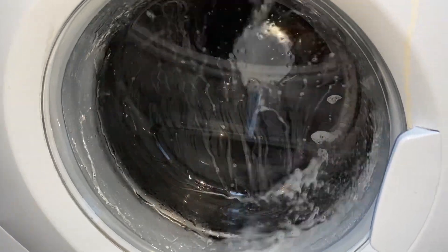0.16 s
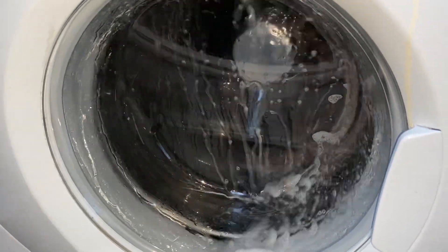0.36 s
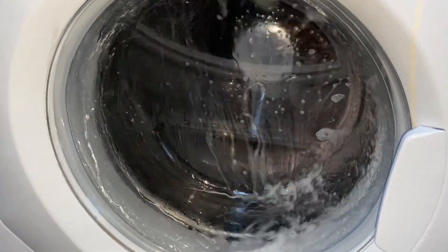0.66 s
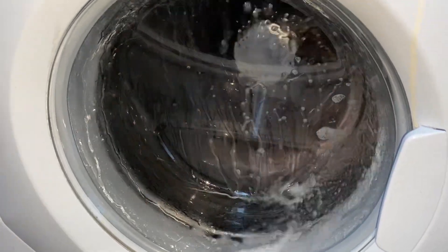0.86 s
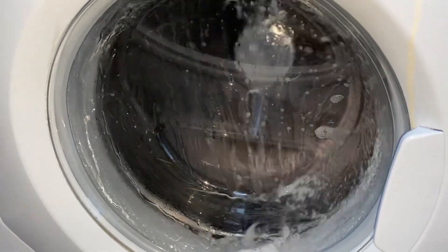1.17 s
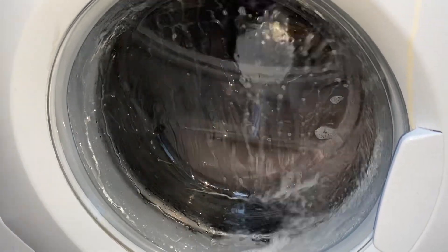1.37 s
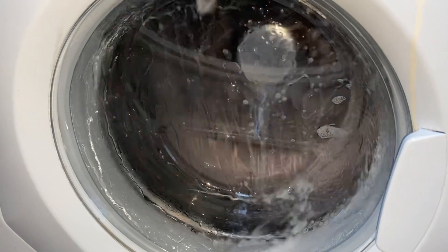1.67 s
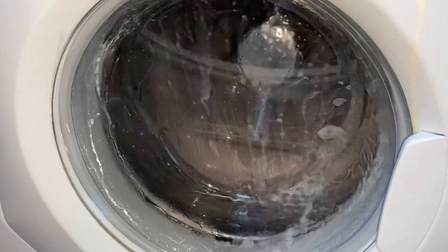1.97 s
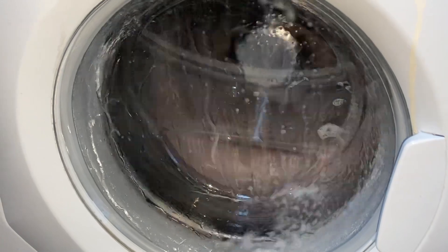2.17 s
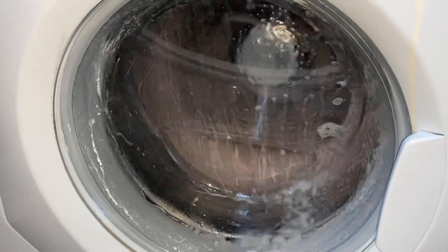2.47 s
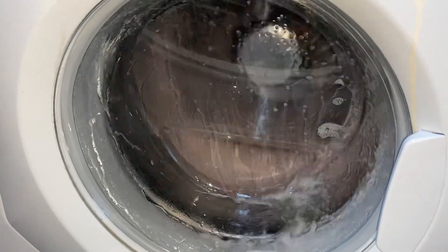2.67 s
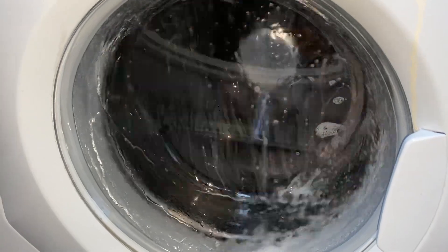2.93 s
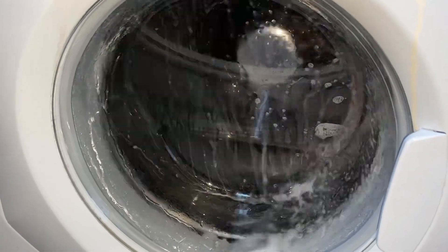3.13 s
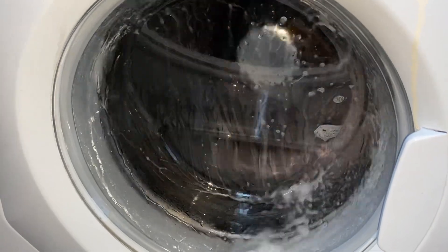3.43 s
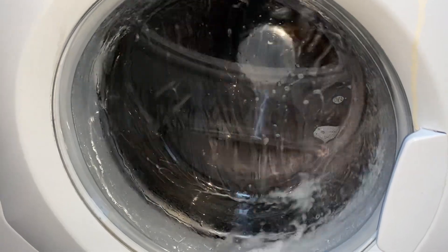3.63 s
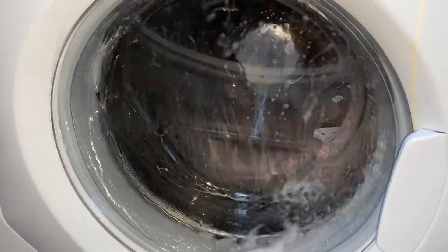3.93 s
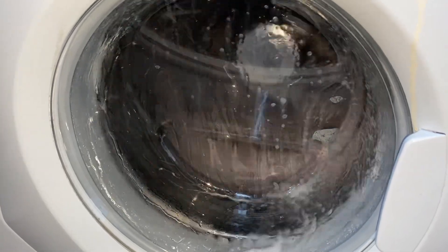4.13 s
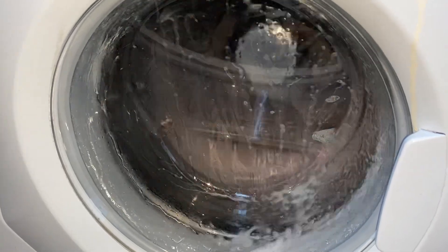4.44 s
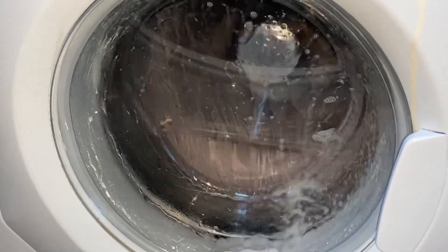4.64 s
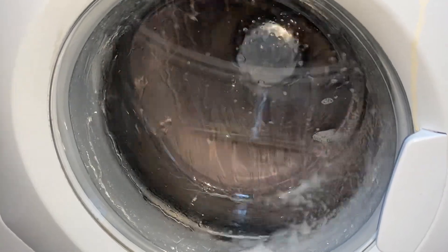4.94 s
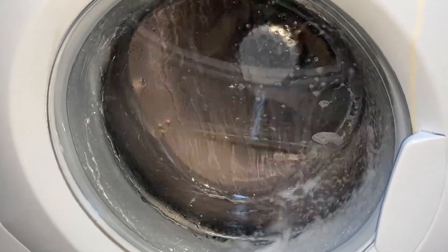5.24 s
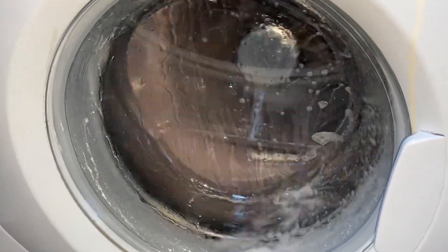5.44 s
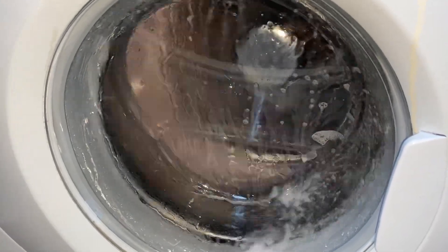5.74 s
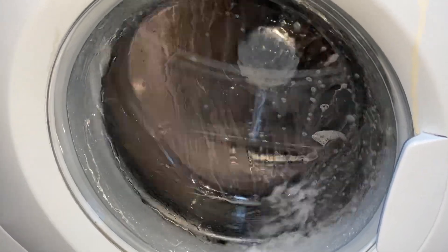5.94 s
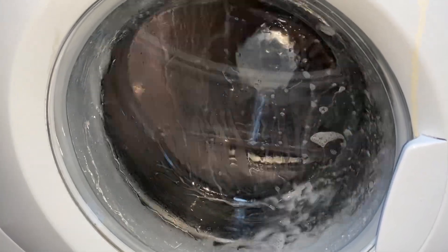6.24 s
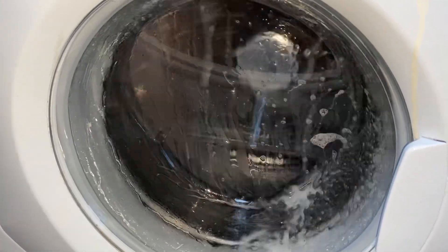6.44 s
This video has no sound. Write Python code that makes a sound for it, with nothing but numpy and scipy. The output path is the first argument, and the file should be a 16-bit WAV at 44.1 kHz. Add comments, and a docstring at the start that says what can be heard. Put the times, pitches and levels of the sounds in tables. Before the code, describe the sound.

Close beside a front-loading washer indoors, a heavy load is already spinning fast. A loud low hum throbs in very rapid jolts, about twenty to forty a second, shaking the cabinet. Loose parts knock in a dense repeating rattle, ringing thin panels. Over it sit a faint metallic motor whine and rough air and spray hiss. It continues without a stop, speed swaying only slightly.

```python
"""A heavy low throb comes first: an unbalanced load spins at about 600 turns a minute and shakes the
cabinet of a front-loading washer at whole orders of the drum turn, close to a two-port microphone.
Loose parts knock at nearly the same angles each turn and ring the panels; the belt-driven motor whines
at multiples of its pole rate. Behind lie shaped noise for air and spray, a noise pattern that nearly
repeats each turn for the uneven rim, and short tuned grains for spray on the door glass."""
import sys
import numpy as np
from scipy import signal
from scipy.fft import rfft, irfft
from scipy.io import wavfile
from scipy.ndimage import uniform_filter1d

SR = 44100
rng = np.random.default_rng(int(sys.argv[2]) if len(sys.argv) > 2 else 0)


def unload_audio(sound):
    """Save the sound as a 16-bit wav file, at the path given as the first command line argument."""
    columns = np.transpose(np.atleast_2d(sound))
    # keep every value between -1 and 1, then stretch to whole-number steps
    steps = np.round(np.clip(columns, -1, 1) * 32767)
    wavfile.write(sys.argv[1], SR, steps.astype(np.int16))


N = 291060

# air and spray noise before throb and port tilt: f/Hz, level/dB per Hz
HISS_SPECTRUM = [(20, -75), (60, -51), (150, -61), (300, -59.5), (800, -60), (1300, -67), (1900, -67.5),
                 (3000, -69.5), (4400, -73), (6000, -82), (7600, -81.5), (9200, -81), (10500, -80),
                 (12000, -88), (13200, -79), (14600, -79.5), (15700, -72)]
# repeating rim noise before port tilt: f/Hz, nominal level/dB per Hz
DRONE_SPECTRUM = [(30, -99), (60, -53), (90, -58), (150, -59.5), (240, -52), (380, -56), (640, -61),
                  (700, -54), (790, -53.5), (860, -64), (1500, -67), (2200, -80.5)]
# motor multiples that stand out, before waver and throb: {multiple of the pole rate: level/dB rms}
WHINE_LEVELS = {17: -51, 22: -57, 25: -58, 33: -56, 36: -42, 37: -54, 41: -53, 43: -52, 53: -54, 58: -50,
                62: -54, 66: -48}
# knocks of loose parts: drum angle/turns, relative level/dB, brightness/0-1
LOOSE_PARTS = [(.0, -24, .5), (.16, -27, .4), (.29, -27, .5), (.44, -26, .4), (.45, -25, 1), (.5, -25, .7),
               (.58, -24, .2), (.64, -24, .3), (.7, -26, .7), (.79, -24, .6), (.9, -27, .6), (.95, -25, .3)]
# panel modes rung by the knocks: f/Hz, relative level/dB, t60/s
PANEL_MODES = [(387.4, -5, 0.1), (497, -10.5, 0.096), (554.5, -9.5, 0.1), (696.2, -7.5, 0.11),
               (772, -2.5, 0.071), (957, -3, 0.061), (1077, -15.5, 0.2), (1169, -3.5, 0.062),
               (1274, -11.5, 0.05), (1399.5, -1, 0.043), (1560, -4.5, 0.028)]
# cabinet shake: order of the turn, level/dB rms at REF_RPM, gain/dB per rpm above it, left-right/dB
SHAKE_ORDERS = [(2, -42, 0, 1), (4, -27.5, .1, 2.7), (6, -30.4, .8, 1.2), (8, -19.4, .3, 2.2),
                (9, -37, 0, 2.2), (10, -23.7, -.1, 1.6), (12, -14.8, -.3, 2.3), (14, -28.8, .9, 2),
                (16, -29.4, -.4, 3.6), (18, -37, 1.5, 9), (20, -31, .9, 7.5), (22, -40.5, 2, 0),
                (26, -37, .2, -1.4), (36, -38, 2.5, -2.7)]
# microphone ports: f/Hz, left-right likeness/0-1, left-right level/dB, left port's lead/rad
MIC_PORTS = [(60, .99, 2, 0), (170, .9, 2, 0), (500, .35, 1.1, 0), (950, .45, 1.4, 1.3), (1600, .1, .6, .5),
             (2900, .6, 1.4, .3), (4300, .55, .8, .7), (5700, .25, 2.5, .1), (6700, .99, 0, 0)]

# the drum speed swings past its set point and settles
SET_RPM, SWING_RPM, SETTLE_S, SWING_S, SWING_START_RAD = 591.901, -8.735, 4.134, 10.1155, 1.2663
START_TURN, REF_RPM = -.034, 594  # drum angle at the start; speed at which the levels are set
DROPS_DB, DROPS_PER_S = -46.5, 400  # rms before port tilt; average rate
MOTOR_RATIO = 23.97  # motor pole passes per drum turn
# faint multiples of the pole rate, 8th to 66th: mean level, random spread, lift below the 17th
FAINT_DB, FAINT_SPREAD_DB, FAINT_LOW_DB = -65, 3, 5.5
# the 18th multiple: level before its swell, rise, then middle and length of that rise
SLOT_DB, SLOT_SWELL_DB, SLOT_SWELL_S, SLOT_RISE_S = -50, 6, 4.3, .7
KNOCK_DB, KNOCK_DB_PER_RPM = -.85, .5  # trim at REF_RPM; faster spin, harder knocks
# order 25 meets a cabinet resonance: peak rms before build-up, half width, speed, build-up time
HUM_DB, HUM_WIDTH_RPM, HUM_RPM, HUM_BUILD_S = -29, 1.6, 592., .3
# the right side's treble phase steps ahead in four half-cycle steps: first middle, spacing, width, likeness
# lost mid step
STEP_HZ, STEP_SPACING_HZ, STEP_WIDTH_HZ, STEP_LOSS = 8100, 2050, 1300, .22
EDGE_HZ = 15750  # band limit

T = np.arange(N) / SR
SWING = np.exp(-T / SETTLE_S) * np.cos(2 * np.pi * T / SWING_S + SWING_START_RAD)
RPM = SET_RPM + SWING_RPM * SWING
TURN = START_TURN + np.cumsum(RPM) / 60 / SR  # drum angle in turns


def gain_of(db):
    """Decibels to amplitude."""
    return 10 ** (np.asarray(db) / 20)


def read(points, hz, column=1):
    """Reads a table on a log-frequency axis."""
    rows = np.transpose(points)
    return np.interp(np.log(hz + 1), np.log(rows[0] + 1), rows[column])


def drifting(shape, memory_steps):
    """Unit noise that changes slowly along the first axis."""
    keep = np.exp(-1 / memory_steps)
    fresh = rng.standard_normal((shape[0] + 60,) + shape[1:])  # 60 steps of run-in
    drift = signal.lfilter([np.sqrt(1 - keep * keep)], [1, -keep], fresh, axis=0)
    return drift[-shape[0]:]


def ports(a, b, spectrum=((1, 0), (2, 0))):
    """Colours two signals and mixes them into a partly alike left and right; the default is flat."""
    hz = np.fft.rfftfreq(N, 1 / SR)
    half_cycles = sum(np.clip((hz - STEP_HZ - k * STEP_SPACING_HZ) / STEP_WIDTH_HZ + .5, 0, 1) for k in range(4))
    same = read(MIC_PORTS, hz) - STEP_LOSS * np.sin(np.pi * half_cycles) ** 2
    tilt = gain_of(read(MIC_PORTS, hz, column=2) / 2)
    right_lag = read(MIC_PORTS, hz, column=3) - np.pi * half_cycles
    a, b = rfft(a), rfft(b)
    right = (same * a + np.sqrt(1 - same ** 2) * b) * np.exp(-1j * right_lag)
    return irfft(np.array([a * tilt, right / tilt]) * gain_of(read(spectrum, hz)), N)


def hiss(throb_db=1.13, throb_turn=.51, flicker_db=.5, db_per_rpm=.13):
    """Air and spray: noise throbbing twice a turn, flickering, and weaker while the drum is still slow."""
    flicker = uniform_filter1d(rng.standard_normal(N), 600) * np.sqrt(600)
    throb = np.cos(4 * np.pi * (TURN - throb_turn))
    slow_rpm = np.minimum(RPM - REF_RPM, 0)
    level = gain_of(throb_db * throb + flicker_db * flicker + db_per_rpm * slow_rpm)
    return ports(*rng.standard_normal((2, N)) * level, HISS_SPECTRUM) * np.sqrt(SR / 2)


def drone(memory_turns=7.4):
    """The drum's uneven rim passes again each turn: noise that repeats and changes only slowly."""
    steps = 4096  # noise points around the rim
    rim = drifting((int(TURN[-1]) + 2, 2, steps), memory_turns)
    place = (TURN + 1) * steps
    points = np.arange(rim[:, 0].size) + steps / 2
    a, b = (np.interp(place, points, rim[:, k].ravel()) for k in (0, 1))
    return ports(a, b, DRONE_SPECTRUM) * np.sqrt(SR / 2)


def drops(low_hz=2200, high_hz=3700, cycles=24., spread_db=5.):
    """Spray flung against the door glass: short tuned grains, a few of them large."""
    hits = rng.random(N) < DROPS_PER_S / SR
    size = gain_of(spread_db * np.minimum(rng.exponential(1, N), 4)) * hits
    pitch = rng.integers(0, 16, N)
    out = np.zeros((2, N))
    for k, hz in enumerate(np.geomspace(low_hz, high_hz, 16)):
        phase = np.arange(int(cycles * SR / hz)) * hz / SR  # in cycles
        grain = np.sin(np.pi * phase / cycles) ** 2 * np.sin(2 * np.pi * phase)
        out[k % 2] += signal.oaconvolve(size * (pitch == k), grain)[:N]
    return ports(*(gain_of(DROPS_DB) * out / out.std()))


def whine(ripple_rad=.028, wobble_rad=.012, waver_db=2., ripples_per_turn=2.1):
    """Multiples of the pole rate; the load ripples the motor speed, which spreads the high ones."""
    multiples = np.arange(8, 67)
    slow = np.arange(0, N + 512, 512)  # control points in samples
    wander = drifting((len(slow), 60), 1.0)  # 59 levels and one motor angle
    faint_db = FAINT_DB + FAINT_LOW_DB * (multiples < 17) + FAINT_SPREAD_DB * rng.standard_normal(59)
    swell = np.clip((slow / SR - SLOT_SWELL_S) / SLOT_RISE_S + .5, 0, 1)
    slot_db = SLOT_DB + SLOT_SWELL_DB * swell
    ripple_angle = 2 * np.pi * ripples_per_turn * TURN
    angle = 2 * np.pi * MOTOR_RATIO * TURN + ripple_rad * np.sin(ripple_angle)
    angle += wobble_rad * np.interp(np.arange(N), slow, wander[:, -1])
    out = np.zeros(N)
    for k, multiple in enumerate(range(8, 67)):
        db = slot_db if multiple == 18 else WHINE_LEVELS.get(multiple, faint_db[k])
        size = np.interp(np.arange(N), slow, gain_of(db + waver_db * wander[:, k]))
        out += size * np.sqrt(2) * np.cos(multiple * angle + 2 * np.pi * rng.random())
    out *= 1 + .15 * np.cos(ripple_angle)  # the same ripple throbs the level
    return ports(out, np.roll(out, -9))  # a copy nine samples ahead serves as the second signal


def knocks(wander_db=1.4, jitter_turns=.004, tilt_db=9., soft_s=.003):
    """Each part knocks once a turn; its strength and angle drift, and bright knocks favour the high modes."""
    turns = np.arange(int(TURN[-1]) + 1)[:, None]
    t = np.arange(8192) / SR
    angle, db, bright = np.transpose(LOOSE_PARTS)
    chance = drifting((len(turns), len(LOOSE_PARTS), 2), 2.75)  # memory in turns
    at = np.searchsorted(TURN, turns + angle + jitter_turns * chance[..., 0]).clip(0, N - 1)
    strength_db = db + wander_db * chance[..., 1]
    out = np.zeros((2, N))
    for hz, mode_db, t60 in PANEL_MODES:
        size = gain_of(strength_db + mode_db + tilt_db * (bright - .5) * np.log2(hz / 800))
        soft_start = 1 - np.exp(-t / soft_s)  # padded blow
        ring = gain_of(-60 * t / t60) * np.sin(2 * np.pi * hz * t) * soft_start
        for side in out:  # each part couples to each mode with its own sign
            signs = rng.choice([-1., 1.], len(LOOSE_PARTS))
            blows = np.bincount(at.ravel(), (size * signs).ravel(), N)
            side += signal.oaconvolve(blows, ring)[:N]
    level = gain_of(KNOCK_DB + KNOCK_DB_PER_RPM * (RPM - REF_RPM))
    return ports(*out * level, ((120, -40), (300, 0)))  # small panels radiate little bass


def resonant_hum():
    """Order 25 swells as it meets a cabinet resonance, which takes time to build up and die."""
    lag = np.exp(-1 / (HUM_BUILD_S * SR))
    response = 1 / np.sqrt(1 + ((RPM - HUM_RPM) / HUM_WIDTH_RPM) ** 4)
    level = signal.lfilter([1 - lag], [1, -lag], response)
    tone = np.cos(2 * np.pi * (25 * TURN + rng.random()))
    return np.ones((2, 1)) * gain_of(HUM_DB) * np.sqrt(2) * level * tone


def shake(firm_lead=3.7, late_lead=6.5, ahead_rad=.6, ahead_hz=145, ahead_width_hz=35,
          slide_rad_per_rpm=.3, slide_hz=130, slide_width_hz=18):
    """Four jolts a turn, every second one a little late: in-between orders fall a quarter cycle behind."""
    extra_rpm = np.maximum(RPM - REF_RPM, -3.5)
    out = resonant_hum()
    for order, db, db_per_rpm, pan_db in SHAKE_ORDERS:
        # low orders lead, as behind a bass cut
        phase = (late_lead / order) ** 2 - np.pi / 2 if order % 4 else (firm_lead / order) ** 2
        hz = order * REF_RPM / 60
        # orders near ahead_hz lead
        phase = phase + ahead_rad * np.exp(-((hz - ahead_hz) / ahead_width_hz) ** 2)
        # orders near slide_hz move ahead as the drum speeds up
        slide = slide_rad_per_rpm * np.exp(-((hz - slide_hz) / slide_width_hz) ** 2)
        phase = phase + slide * extra_rpm
        level = gain_of(db + db_per_rpm * extra_rpm) * np.sqrt(2)
        tone = level * np.cos(2 * np.pi * order * TURN + phase)
        out += tone * gain_of([[pan_db / 2], [-pan_db / 2]])
    return out


def scene():
    """All the sources at the microphone."""
    return hiss() + drone() + drops() + whine() + knocks() + shake()


def record(dry):
    """A soft knee rounds the highest peaks; a small offset, then the band limit."""
    knee, room = .7, .22  # amplitude where rounding starts; most it can add above that
    excess = np.maximum(abs(dry) - knee, 0)
    rounded = np.clip(dry, -knee, knee) + np.sign(dry) * room * np.tanh(excess / room)
    low_pass = signal.firwin(2047, EDGE_HZ, window=("kaiser", 9), fs=SR)
    return signal.oaconvolve(rounded + .0044, low_pass[None], "same")


dry = scene()
out = record(dry)
unload_audio(out)
```